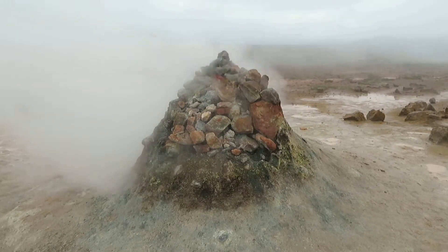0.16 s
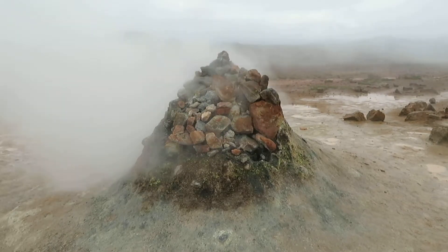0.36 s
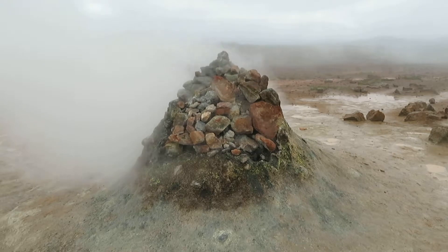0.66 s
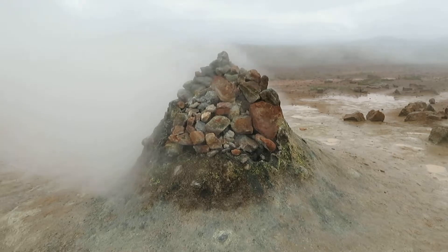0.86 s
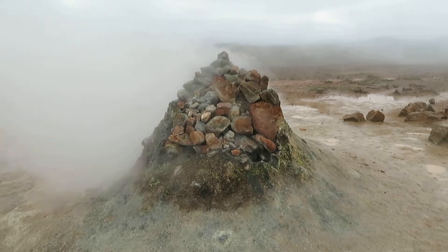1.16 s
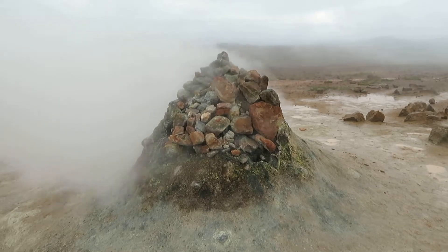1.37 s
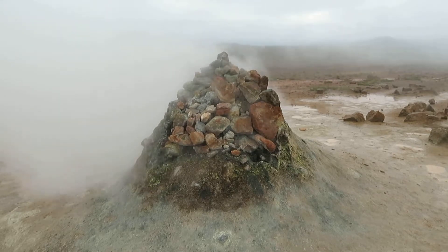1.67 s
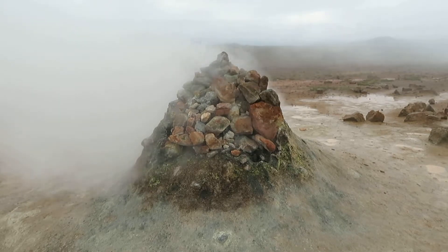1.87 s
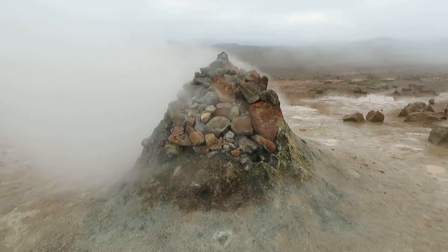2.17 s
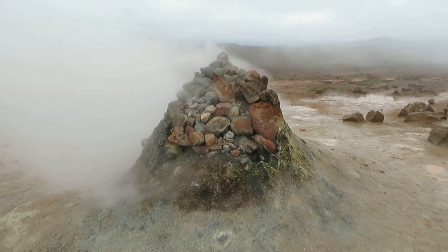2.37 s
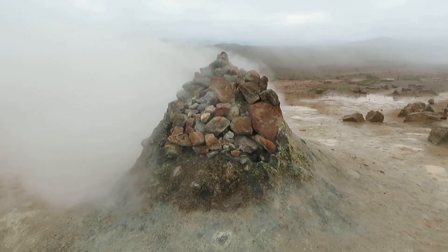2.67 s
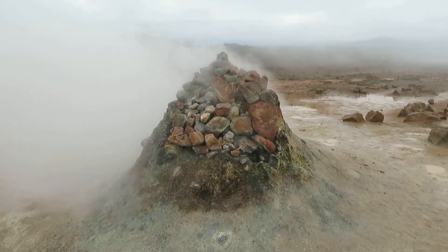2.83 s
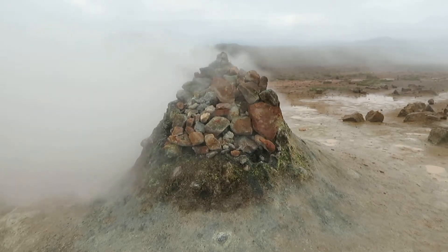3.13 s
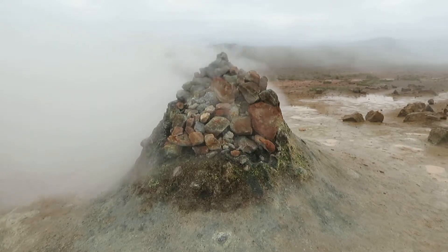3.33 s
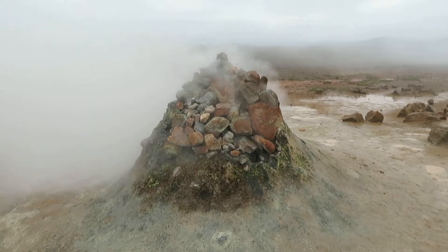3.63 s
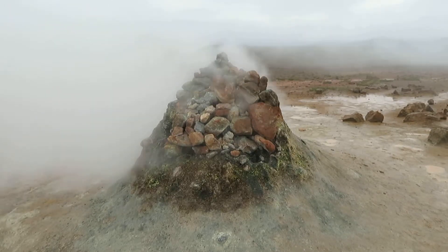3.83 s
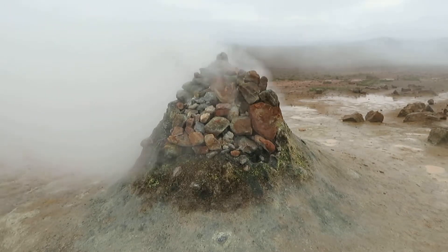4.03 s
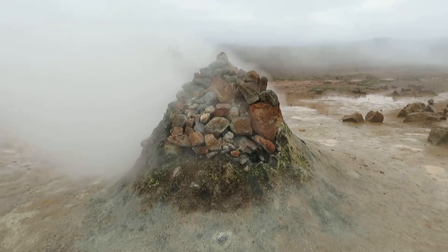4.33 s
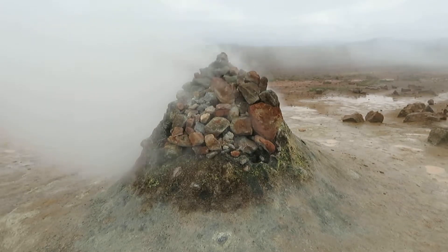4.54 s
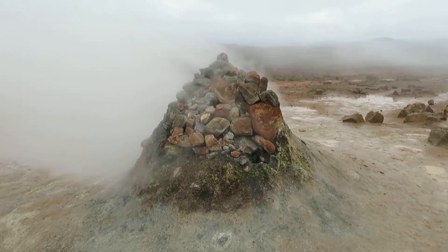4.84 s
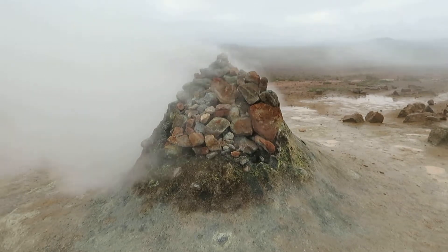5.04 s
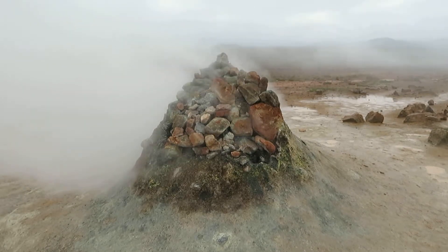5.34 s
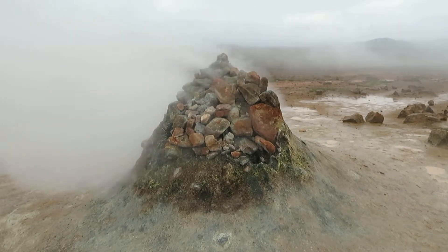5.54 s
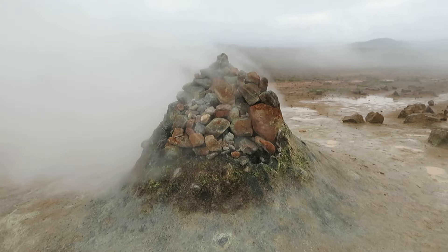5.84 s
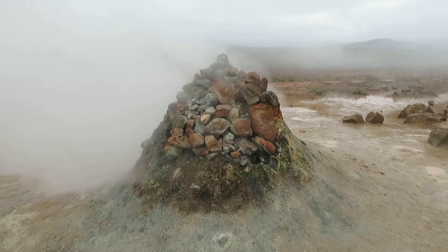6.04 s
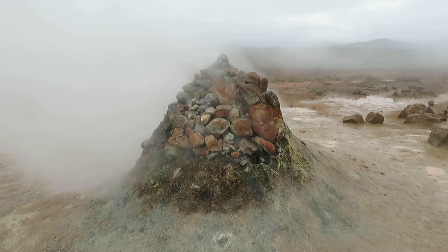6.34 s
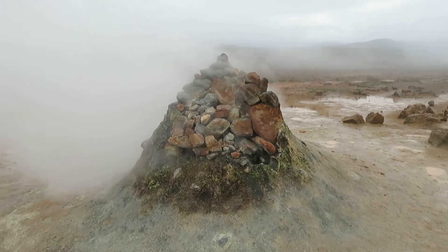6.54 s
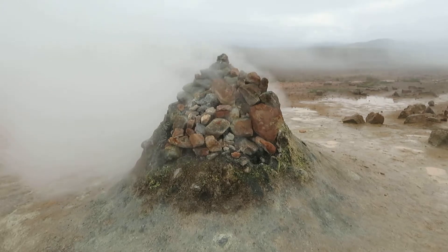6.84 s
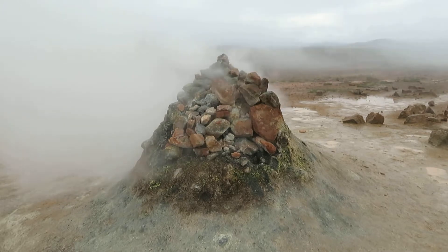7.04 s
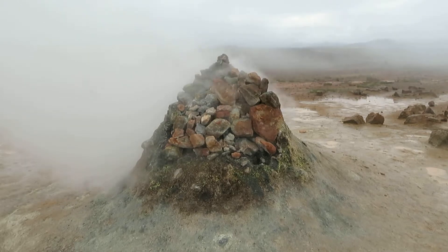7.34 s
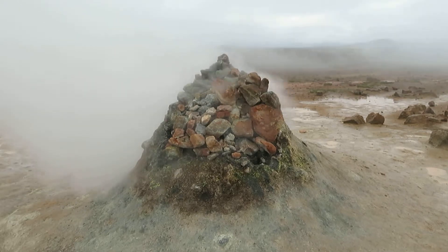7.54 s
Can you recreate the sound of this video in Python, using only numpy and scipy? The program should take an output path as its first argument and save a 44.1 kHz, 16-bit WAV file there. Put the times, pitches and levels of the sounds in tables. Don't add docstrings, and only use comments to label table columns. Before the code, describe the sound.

Deep, unbroken rush of steam pushing out through gaps between stones in open ground. Low rumble heaves and sags in short swells, a hollow windy tone wavers above it, and fine hiss puffs softly. Near the middle comes a crisp double click from the camera's own button, much sharper than the steam; other shell ticks are barely noticeable. The roar grows slightly stronger towards the end. Wide stereo, microphone built into the camera, treble slightly thin and grainy.

```python
import sys
import numpy as np
from scipy import signal
from scipy.fft import rfft, irfft, next_fast_len
from scipy.io import wavfile
from scipy.ndimage import uniform_filter1d, map_coordinates

SR = 44100
rng = np.random.default_rng(int(sys.argv[2]) if len(sys.argv) > 2 else 0)


def dump_mix(stems):
    frames = np.atleast_2d(stems).T
    limited = np.clip(frames, -1, 1)
    pcm = np.round(limited * 32767).astype(np.int16)
    wavfile.write(sys.argv[1], SR, pcm)


def volts(x):
    e = np.asarray(x, float) / 20
    return 10 ** e


N = 339570
TIME = np.arange(N) / SR


def unit(x):
    return x / np.sqrt(np.mean(x ** 2) + 1e-20)


def wobble(rate):
    knots = rng.standard_normal(int(N * rate / SR) + 4)
    return map_coordinates(knots, [np.arange(N) * rate / SR])


def curves(rows):
    s, *cols = np.transpose(rows)
    return [np.interp(TIME, s, c) for c in cols]


def swells(rows, half_s):
    return sum(db * np.exp(-.5 * ((TIME - s) / half_s) ** 2) for s, db in rows)


def low_pass(x, corner_hz):
    hz = np.fft.rfftfreq(N, 1 / SR)
    return irfft(rfft(x) / (1 + (hz / corner_hz) ** 6), N)


def turbulence(patchy_db, bins, frames):
    z = signal.stft(rng.standard_normal((2, N + 1024)), nperseg=512)[2]
    field = rng.standard_normal(z.shape[1:])
    field = uniform_filter1d(uniform_filter1d(field, bins, 0), frames, 1)
    return signal.istft(z * volts(patchy_db * unit(field)), nperseg=512)[1][:, :N]


JOINS = [0, 485, 1495, 5600, 15600]
# (frequency [Hz], width [Hz], level [dB])
CAVITY = (524, 55, 3.2)


def heard(pair, table, part):
    m = next_fast_len(N + 8192)
    hz = np.fft.rfftfreq(m, 1 / SR) + 1
    knots, *cols = np.transpose(table)
    db, tilt_db, lead, alike = [np.interp(np.log(hz), np.log(knots), c) for c in cols]
    if part == 0:
        db = db + 12 * np.log10(np.minimum(hz / knots[0], 1))
    cavity_hz, width_hz, cavity_db = CAVITY
    db = db + cavity_db / (1 + (2 * (hz - cavity_hz) / width_hz) ** 2)
    rise, fall = [np.clip(np.log(hz / max(j, 1e-3)) * 15 + .5, 0, 1) for j in JOINS[part:part + 2]]
    gain = volts(db) * np.sqrt(rise * (1 - fall))
    a, b = rfft(np.pad(pair, [(0, 0), (0, m - N)], "wrap")) * gain
    turn = np.arccos(np.clip(alike, 0, 1)) / 2
    port = volts(tilt_db / 2) * np.exp(.5j * lead)
    left = (np.cos(turn) * a + np.sin(turn) * b) * port
    right = (np.cos(turn) * a - np.sin(turn) * b) / port
    even = np.sqrt(np.cosh(tilt_db * np.log(10) / 20))
    ports = irfft(np.array([left, right]) / even, m)[:, :N]
    return ports / np.std(ports.mean(0))


# (frequency [Hz], density [dB per Hz], left over right [dB], left lead [rad], likeness [0-1])
ROAR = [(21, -14.5, .2, 0, .995), (53, -4.5, .4, 0, .99), (85, -1.5, 1.2, -.08, .95),
        (118, .5, 2, -.23, .9), (150, -.8, 1.8, -.45, .79), (193, -1.5, 1.8, -.72, .78),
        (258, -4, .2, -1.25, .8), (322, -7.3, -.6, -1.7, .75), (441, -13.3, -.5, -1.89, .8),
        (473, -14, -1.6, -1.54, .63)]
# (time [s], roar level [dB])
PRESSURE = [(0, -23.5), (.6, -22.5), (1.35, -25.5), (1.9, -24), (2.45, -24), (3.1, -22), (3.6, -23),
            (4.7, -23.5), (5.85, -22), (6.15, -25.5), (6.75, -22.5), (7.1, -19.5), (7.7, -22)]
# (time [s], swell [dB])
HEAVES = [
    (.6, 0),
    (1.1, 7),
    (2.75, -7),
    (3.3, -8),
    (4.2, 5),
    (4.65, 2.5),
    (5.55, 6),
    (6.25, -1),
    (7.7, 4),
]
# (time [s], swell [dB])
BURSTS = [(.4, -2), (1.05, 1), (1.75, -0.5), (2.6, 2), (3.0, -1.5), (3.5, 0), (4.2, 1), (5.1, 4), (5.7, 0),
          (6.15, 2), (6.6, 3), (6.95, 2), (7.4, 1)]
BURST_S = 0.13


def throat_roar():
    roar = heard(turbulence(0.67, 3, 10), ROAR, 0)
    rumble = low_pass(roar, 70)
    growl = roar - low_pass(roar, 240)
    rumble_db = -.5 + swells(HEAVES, 0.11)
    growl_db = -.5 + swells(BURSTS, BURST_S)
    roar = roar + rumble * (volts(rumble_db) - 1) + growl * (volts(growl_db) - 1)
    roar_db = curves(PRESSURE)[0] + 1.47
    return volts(roar_db + 0.29 * wobble(7.0)) * roar


# (frequency [Hz], density [dB per Hz], left over right [dB], left lead [rad], likeness [0-1])
GAPS = [(465, -5, 4, -2.5, 0.98), (536.4, -1.5, -2, 1.4, 1), (605, -4, -6.5, -1, .53),
        (676, -4.5, -4, -2, 0.53), (793, -8.5, -9, -3.5, 0.31), (882, -13, -1, -2.5, 0.38),
        (1012, -19, .9, -3.3, .78), (1076, -19.5, -1.5, -3.05, .86), (1184, -22.7, 1.1, -3.21, .5),
        (1252, -22, 6.5, -5, 0.61), (1310, -19.5, 6, -8.5, .7), (1392, -24, 4, -5, .42),
        (1430, -28, 7, -4.5, 0.5), (1500, -25, 0, -5, 0.52)]
# (time [s], swell [dB])
SHIFTS = [
    (.4, -3),
    (1.35, 1.5),
    (2.4, -1.5),
    (3.05, 0.5),
    (3.9, 4),
    (4.9, 1.5),
    (5.35, -1.5),
    (6.33, 3),
    (7.15, 1),
    (7.42, -1),
]
# (time [s], swell [dB])
SPRAYS = [
    (2.6, 3),
    (5.15, 3),
    (6.1, 0),
    (7.2, 4.5),
]
# (low corner [Hz], high corner [Hz])
SPRAY_HZ = (850, 1200)


def gap_rush():
    rush_db = -36.5 + 0.083 * swells(BURSTS, BURST_S) + swells(SHIFTS, 0.037)
    rush_db = rush_db + 0.15 * wobble(5) + 0.89 * wobble(15)
    rush = volts(rush_db) * heard(turbulence(1.76, 3, 10), GAPS, 1)
    spray = low_pass(rush, SPRAY_HZ[1]) - low_pass(rush, SPRAY_HZ[0])
    return rush + spray * (volts(swells(SPRAYS, BURST_S)) - 1)


# (frequency [Hz], density [dB per Hz], left over right [dB], left lead [rad], likeness [0-1])
JETS = [(1503, -3.5, 12, 1.3, 0.94), (1560, -0.5, 7.2, 0.73, 0.47), (1674, -2.5, 2.4, 0.22, 0.93),
        (2710, -5.5, 0.5, 0.08, 0.88), (2786, -3.5, 0.5, 0.07, 0.99), (3110, -10.5, 0.8, 0.24, 0.84),
        (3240, -12.5, 2.4, 0.74, 1), (3440, -9, 1.2, 0.31, 0.7), (3820, -13.5, 0.8, 0.17, 0.99),
        (3789, -15, 0.6, 0.23, 0.61), (4180, -9.5, 2.4, 1.04, 0.9), (4640, -11, 1.9, 0.87, 0.87),
        (4870, -13, 0.6, 0.29, 0.83), (5570, -24, 0.3, 0.23, 0.41)]
# (time [s], swell [dB])
PUFFS = [(.15, 3.5), (.5, -3.5), (.65, 2.5), (1.17, 1.5), (1.72, -2), (1.95, -2), (2.4, 0.5), (3.17, -1.5),
         (3.45, -3), (3.75, 1), (4.0, -1), (4.2, 3), (4.38, -1), (4.77, 1.5), (5.3, 1.5), (5.72, -1.5),
         (6.6, -2), (6.93, 0), (7.05, -0.5), (7.17, 1), (7.65, -2.5)]


def jet_hiss():
    hiss_db = -44 - 0.0048 * TIME + swells(PUFFS, 0.045)
    flutter = 0.64 * wobble(13) + .5 * wobble(30)
    hiss = volts(hiss_db + flutter) * heard(turbulence(0.64, 8, 12), JETS, 2)
    swell_db = 0.25 * (hiss_db - np.median(hiss_db)) + 0.31 * flutter
    return hiss, swell_db


# (frequency [Hz], density [dB per Hz], left over right [dB], left lead [rad], likeness [0-1])
AIR = [(5550, 1, .3, .3, .37), (6700, -2.5, 0.028, .1, .15), (7900, -4.5, 0, 0, .15),
       (11500, -11, 0.034, 0.021, 0.28), (14600, -18.5, 0, 0.035, .2), (15300, -20.5, 0.024, 0.014, .2)]


def far_air(swell_db):
    return volts(-64.5 + swell_db) * heard(turbulence(.4, 10, 8), AIR, 3)


def steam():
    hiss, swell_db = jet_hiss()
    return throat_roar() + gap_rush() + hiss + far_air(swell_db)


# (time [s], strength [dB], press or release [0 or 1],
# brightening over 5 kHz [dB per octave], share felt alike at both ports [dB])
SNAPS = [
    (3.2842, 0, 0, 0, 0),
    (3.3707, 0, 1, 0, 0),
    (.8515, -24, 0, 3, -2),
    (1.2678, -30, 0, 3, -4),
    (7.3299, -27, 0, 10, -4),
]
# (frequency [Hz], press alike [dB], press opposed [dB],
# release alike [dB], release opposed [dB])
SHELL = [(750, 1, 4, -12, -17), (1330, 15, 10, 5.5, 1), (2070, 13, 8, 10, -1), (2540, 14, 2, 5.5, -14),
         (3090, 5, 4, -7, -4), (4100, -6, 7, -8, 4), (4800, -2, 11, -6, 9), (5700, -14, 6, -22, -8),
         (7000, -13, 4, -20, -10), (8200, -23, -8, -18, -6), (9100, -23, -3, -19, -6),
         (10200, -26, -16, -25, -16), (12200, -32, -23, -30, -33.5), (15500, -48, -32, -46, -40)]
# (delay of press and release [s], level of press and release [dB], corner [Hz])
REBOUND = ((.00197, .0014), (-7, -6), 4000)


def snaps():
    out, size = np.zeros((2, N + SR)), 1024
    hz = np.fft.rfftfreq(size, 1 / SR) + 1
    knots, *cols = np.transpose(SHELL)
    delay_s, rebound_db, corner_hz = REBOUND
    spread = np.exp(-1j * .16 * np.sqrt(hz))
    for s, db, kind, bright_db, alike_db in SNAPS:
        pair = cols[2 * kind:2 * kind + 2]
        colour_db = np.array([np.interp(np.log(hz), np.log(knots), c) for c in pair])
        colour_db += db + np.maximum(bright_db * np.log2(hz / 5000), -40) + [[alike_db], [0]]
        cepstrum = irfft(np.log(volts(colour_db)))
        cepstrum[:, 1:size // 2] *= 2
        cepstrum[:, size // 2 + 1:] = 0
        echo = volts(rebound_db[kind]) * np.exp(-2j * np.pi * hz * delay_s[kind])
        rebound = 1 + echo / (1 + (hz / corner_hz) ** 2)
        alike, opposed = irfft(np.exp(rfft(cepstrum)) * rebound * spread)
        out[:, round(s * SR):][:, :size] += [alike - opposed, alike + opposed]
    return out[:, :N]


def scene():
    return steam() + snaps()


# (frequency [Hz], share lost from mid [0-1], share lost from side [0-1])
STARVED = [(1800, 0, 0), (2000, 0, .12), (2300, 0, 0), (2850, 0, .18), (3200, 0, 0), (5600, 0, 0.06),
           (7000, .03, .15), (9500, .12, .32), (12000, .25, .45), (14700, .33, .55), (15200, .75, .85)]


def thinned(dry):
    mid_side = [dry[0] + dry[1], dry[0] - dry[1]]
    hz, _, z = signal.stft(mid_side, SR, nperseg=2048, boundary="even")
    knots, *shares = np.transpose(STARVED)
    share = np.array([np.interp(hz, knots, s) for s in shares])[:, :, None]
    luck = rng.random((2, len(hz) // 7 + 1, z.shape[2] // 2 + 1))
    luck = luck.repeat(7, 1).repeat(2, 2)[:, :len(hz), :z.shape[2]]
    power = abs(z) ** 2
    loud = power > 8 * np.median(uniform_filter1d(power, 12, 1), 2, keepdims=True)
    near_snap = uniform_filter1d(1. * (loud.mean((0, 1)) > .05), 3) > .1
    kept = (luck > share) | near_snap
    mid, side = signal.istft(z * kept, SR, nperseg=2048)[1][:, :N] / 2
    return np.array([mid + side, mid - side])


def top_cut(x):
    return signal.sosfilt(signal.butter(12, 15310, fs=SR, output="sos"), x)


def record(dry):
    close = np.minimum(np.arange(N, 0, -1) / 60, 1)
    return top_cut(thinned(dry) * close)


dry = scene()
out = record(dry)
dump_mix(out)
```